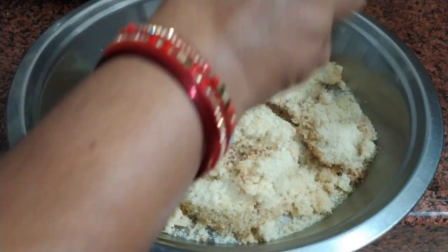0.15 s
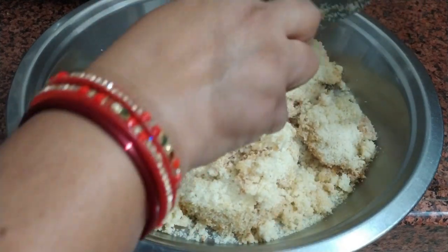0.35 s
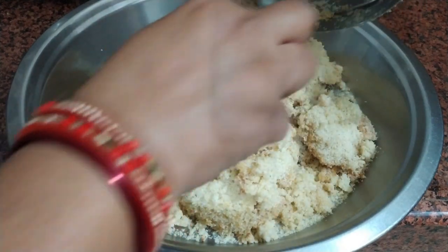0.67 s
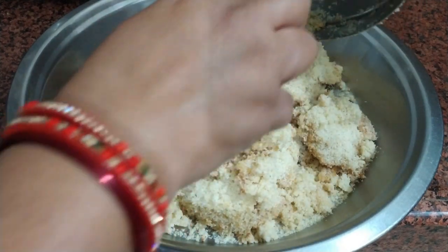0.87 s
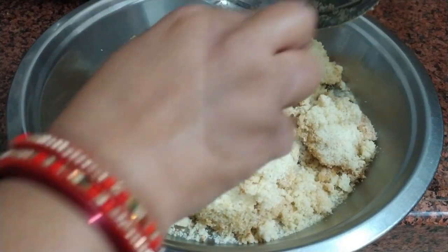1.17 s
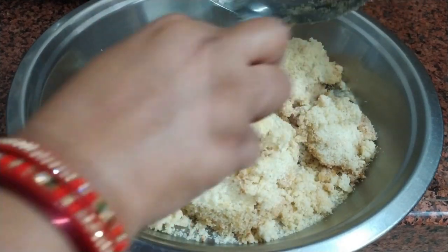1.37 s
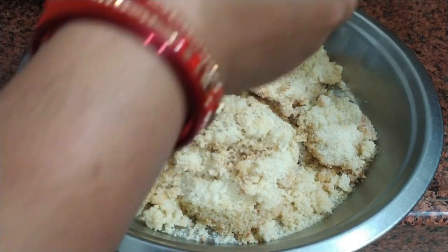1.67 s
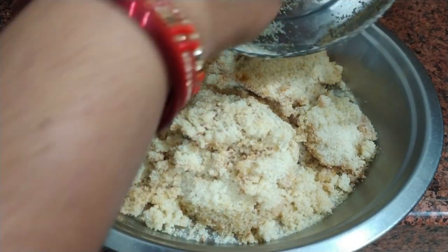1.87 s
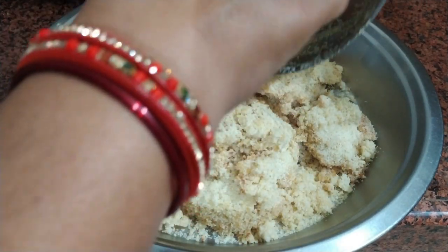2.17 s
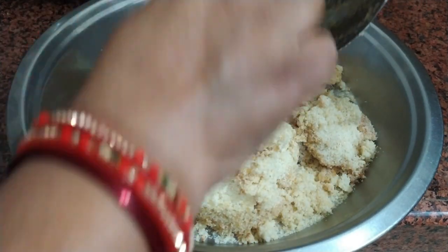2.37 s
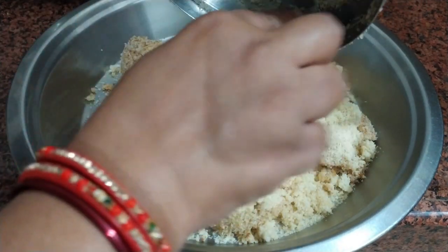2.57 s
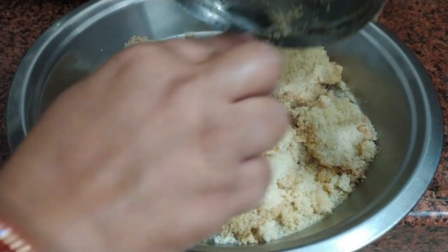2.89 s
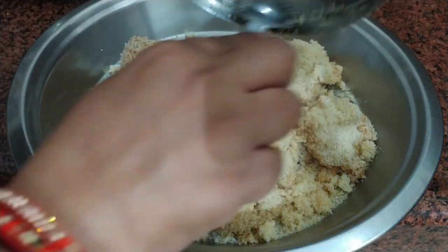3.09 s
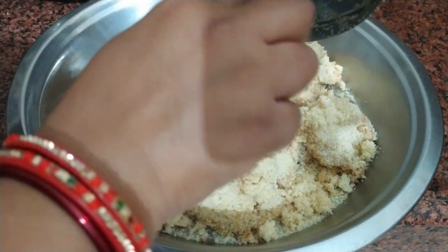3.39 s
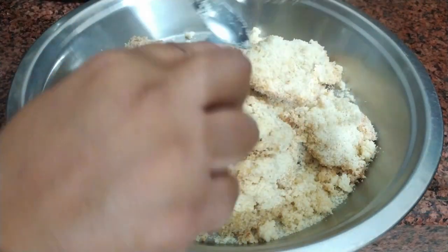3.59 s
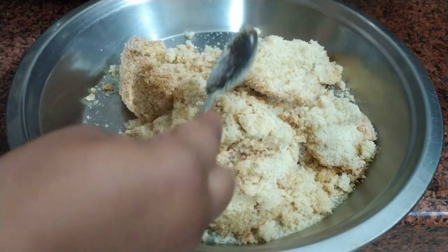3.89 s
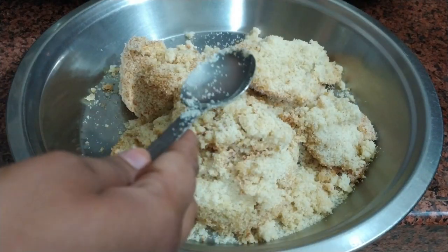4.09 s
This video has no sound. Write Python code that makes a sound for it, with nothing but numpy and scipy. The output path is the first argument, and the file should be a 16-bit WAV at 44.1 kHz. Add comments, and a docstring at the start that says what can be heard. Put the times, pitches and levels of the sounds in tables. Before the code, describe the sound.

A steel spoon knocks and scrapes briskly inside a hand-held steel tin, hollow and gritty, then clanks against a wide steel bowl.

```python
"""Spoon in a steel tin

A steel spoon knocks and scrapes inside a hand-held steel tin, then the tin is set down against a wide bowl.
Blows excite many thin wall modes beside the tin's swelling hollow note; random catches of grit make the hiss
of each stroke. The bowl adds longer, fluttering modes and a beating rim pair. A small hard kitchen answers,
over a low hum and room noise, heard by two close microphones."""
import sys
import numpy as np
from scipy import signal
from scipy.fft import rfft, irfft
from scipy.io import wavfile

SR = 44100
rng = np.random.default_rng(int(sys.argv[2]) if len(sys.argv) > 2 else 0)


def magnitude_from_level(level_db):
    """Linear magnitude for a level in decibels (20 dB per decade)."""
    exponent = np.asarray(level_db, float) / 20
    return 10 ** exponent


def master_out(mix):
    """Clip the mix to full scale and print it as 16-bit PCM to the path in sys.argv[1]."""
    frames = np.transpose(np.atleast_2d(mix))
    ceiling = np.clip(frames, -1, 1)
    pcm = np.round(ceiling * 32767).astype(np.int16)
    wavfile.write(sys.argv[1], SR, pcm)


N = 187072

# blows of steel on steel, strength per register of modes:
# (t/s, tick level/dB, clink level/dB, clank level/dB, knock level/dB, thud level/dB)
KNOCKS = [(0.007, -43.5, -60.5, -61, -53.5, -53), (0.0824, -41.5, -50.5, -47.5, -45, -60),
          (0.2392, -64.5, -74, -70, -58.5, -70), (0.305, -46, -58, -57, -56, -47.5),
          (0.344, -64, -79, -58, -56, -57), (0.3845, -62, -59, -64, -66, -50),
          (0.48, -60, -64, -63, -58, -56), (0.509, -56, -62, -54, -65, -62),
          (0.5344, -38, -49, -42.5, -44.5, -40), (0.6155, -55, -53.5, -46, -71, -64),
          (0.718, -58, -66, -72, -65, -67), (0.7261, -68, -62, -71, -79, -46.5),
          (0.943, -42, -53.5, -46, -55.5, -46), (1.062, -39.5, -49, -51.5, -61, -50),
          (1.247, -36, -49.5, -52, -54.5, -61), (1.3505, -29.5, -40, -52.5, -47.5, -49.5),
          (1.5798, -32.5, -32, -45.5, -36, -41), (1.8229, -50, -52.5, -56, -58, -48),
          (2.157, -46.5, -57, -58.5, -49, -47), (2.222, -38, -50, -44, -46, -42),
          (2.548, -42.5, -50.5, -47, -55.5, -44), (2.61, -44, -45.5, -45.5, -60, -55),
          (2.7333, -29.5, -38.5, -54, -52.5, -40), (3.0043, -35.5, -47.5, -55, -55.5, -53.5),
          (3.097, -31.5, -40, -60, -54.5, -55.5), (3.3679, -47, -57, -58, -51.5, -47.5),
          (3.5184, -30, -40.5, -57, -53, -51.5), (3.7712, -60.5, -76, -73, -68, -78),
          (4.032, -35.5, -31.5, -32.5, -31, -54.5), (4.06, -55, -54, -54, -46, -63),
          (4.113, -46.5, -45, -39.5, -37, -60), (4.127, -58, -59, -45, -48, -59),
          (4.152, -62, -71, -45, -44.5, -70)]
# stereo width over pitch: (f/Hz, side over mid level/dB)
WIDTH = [(60, -0.5), (150, -17), (380, -6.5), (700, -3.5), (1200, -1.5), (2380, -2), (5980, 0.5),
         (15000, 0)]
# stereo balance over pitch: (f/Hz, left over right level/dB)
LEAN = [(60, 0.0), (150, 1.5), (380, -6), (950, 2), (2380, 0.5), (5980, -1.5), (9500, -3), (15000, 1.5)]
SIDES = np.array([[1], [-1]])   # left, right
AFTER = np.arange(SR // 4) / SR   # seconds since a touch
SET_DOWN_S = 4.033
NOTE_SWELL_S, CHOKE_S = 0.0038, 0.01   # swell of the tin's tones; time a damping touch takes
LAND_S = 0.0092   # contact grows over this time


def rms_one(x):
    """Scales to unit rms."""
    return x / np.sqrt(np.mean(x ** 2) + 1e-20)


def at_hz(points, hz):
    """Reads a spectrum on a log-frequency axis."""
    point_hz, values = np.array(points).T
    return np.interp(np.log(hz), np.log(point_hz), values)


def band(x, low_hz, high_hz):
    """Band-pass."""
    return signal.sosfilt(signal.butter(2, [low_hz, high_hz], "band", fs=SR, output="sos"), x)


def add(out, s, sound):
    """Mixes a sound in from second s on."""
    at = int(s * SR)
    out[:, at:at + sound.shape[1]] += sound[:, :N - at]


def spread(low_hz, high_hz, count):
    """Evenly crowded pitches, each a little out of place."""
    return low_hz + (high_hz - low_hz) * (np.arange(count) + rng.random(count)) / count


def wobble(per_s):
    """Slow chance: random heights joined by straight lines."""
    place = np.arange(N) / SR * per_s
    count = int(N / SR * per_s) + 2
    return np.interp(place, np.arange(count), rng.standard_normal(count))


def lands_on_bowl(s):
    """Only the last blows, around the set-down, meet the bowl."""
    return s > SET_DOWN_S - .01


def room_noise():
    """Steady shaped noise, as wide as the rest, and a slightly wavering hum: noise in a narrow band."""
    # room noise spectrum: (f/Hz, level per Hz/dB)
    air_spectrum = [(12, -31), (20, -4), (42, -7.5), (76, -7.5), (100, -9.5), (140, -11), (268, -2),
                    (336, -5.5), (434, -1), (644, -7), (2290, -14), (4770, -25), (5500, -26), (9140, -21),
                    (15600, -36), (17000, -50)]
    air_db, hum_hz, hum_db = -59, 276.2, -66.5
    hz = np.maximum(np.fft.rfftfreq(N, 1 / SR), 1)
    colour_db = at_hz(air_spectrum, hz) + [0 * hz, at_hz(WIDTH, hz)]
    mid, side = irfft(rfft(rng.standard_normal((2, N))) * magnitude_from_level(colour_db), N)
    hum = magnitude_from_level(hum_db) * rms_one(band(rng.standard_normal(N), hum_hz - 5, hum_hz + 5))
    return magnitude_from_level(air_db) / np.std(mid) * (mid + side * SIDES) + hum


def hollow_notes():
    """The tin's note swells within a few cycles, settles from sharp, and is choked by spoon or fingers."""
    # the tin's hollow note: (t/s, level/dB, f/Hz, damped after/s)
    note_events = [(0.001, -30.5, 433, 0.099), (0.083, -25.5, 438, 0.031), (0.24, -36.5, 460, 0.0074),
                   (0.307, -26, 470, 0.0064), (0.344, -31, 439, 0.044), (0.382, -34, 437, 0.039),
                   (0.479, -37.5, 432, 0.02), (0.51, -31, 460, 0.0086), (0.537, -14, 439, 0.0257),
                   (0.725, -32, 432, 0.04), (0.908, -36.5, 443, 0.027), (0.946, -22.5, 428.5, 0.023),
                   (1.063, -32.5, 432, 0.032), (1.252, -36, 432, 0.025), (1.349, -40.5, 443, 0.085),
                   (1.581, -11.5, 443, 0.011), (1.624, -25.5, 448, 0.012), (1.655, -31, 473, 0.025),
                   (1.697, -35, 426, 0.032), (1.743, -43, 470, 0.034), (1.79, -47, 437, 0.026),
                   (1.824, -31, 436, 0.083), (2.155, -28.5, 462, 0.018), (2.221, -34, 411, 0.018),
                   (2.32, -36.5, 450, 0.0092), (2.552, -16.5, 425, 0.023), (2.621, -36.5, 449, 0.027),
                   (2.734, -27, 437, 0.041), (3.012, -37.5, 428, 0.046), (3.097, -32.5, 440, 0.059),
                   (3.37, -24, 428, 0.026), (3.518, -26, 439, 0.051)]
    note_t60_s, choke_end_db = 0.14, -20.5
    sag_share, sag_s = 0.038, 0.0051   # the note starts sharp while the wall is bent
    twin_ratio, twin_db, twin_t60_s = 1.09, -15, 0.12   # close twin, beating against the note
    out, t = np.zeros((2, N)), AFTER
    lean = magnitude_from_level(at_hz(LEAN, 436) / 2 * SIDES)
    bent_time = t + sag_share * sag_s * (1 - np.exp(-t / sag_s))
    swell = 1 - np.exp(-t / NOTE_SWELL_S)
    for s, note_db, hz, free_s in note_events:
        choke_db = choke_end_db * np.clip((t - free_s) / CHOKE_S, 0, 1)
        note = magnitude_from_level(-60 * t / note_t60_s + choke_db) * np.sin(2 * np.pi * hz * bent_time)
        twin_fade = magnitude_from_level(twin_db - 60 * t / twin_t60_s + choke_db / 2)
        twin = twin_fade * np.sin(2 * np.pi * hz * twin_ratio * t)
        add(out, s, lean * magnitude_from_level(note_db) * swell * (note + twin))
    return out


def kitchen(x):
    """Dense reflections after a short gap die band by band, more alike at the two microphones in the bass."""
    # reverberation by band: (from f/Hz, to f/Hz, t60/s, level/dB)
    reverb_bands = [(149, 610, 0.43, -12.5), (614, 1270, 0.48, -9), (1500, 6600, 0.39, -4.5),
                    (6300, 17000, 0.27, -7.5)]
    t = np.arange(SR // 2) / SR
    onset = np.clip((t - .004) / 0.0078, 0, 1)
    echo = 0
    for low_hz, high_hz, t60, level_db in reverb_bands:
        mid, side = rng.standard_normal((2, len(t)))
        width = magnitude_from_level(at_hz(WIDTH, np.sqrt(low_hz * high_hz)))
        tail = (mid + width * side * SIDES) * magnitude_from_level(-60 * t / t60) * onset
        even_tail = tail / np.sqrt(np.sum(tail ** 2) / 2)
        echo = echo + magnitude_from_level(level_db) * band(even_tail, low_hz, high_hz)
    return signal.fftconvolve(x, echo, axes=1)[:, :N]


def steel_modes():
    """Pitch, decay and two-microphone oscillation of every wall mode; modes reach the two sides a phase apart."""
    # strongest wall modes: (f/Hz, level/dB, t60/s before a touch scales it)
    wall_modes = [(130, -23, 0.057), (169, -7, 0.096), (198, -3.5, 0.07), (229, 0, 0.062),
                  (277, -1.5, 0.049), (432, 7, 0.15), (481, 1, 0.079), (765.5, 6.5, 0.056), (895, 3, 0.071),
                  (968, 3.5, 0.056), (1420, -24, 0.053), (1504, 11, 0.03), (1722, 10.5, 0.026),
                  (1910, -3.5, 0.021), (2349, -1.5, 0.064), (2650, -8, 0.02), (3017, 0, 0.027),
                  (4711, -7.5, 0.045), (6970, -4.5, 0.062), (7700, -11.5, 0.06), (8450, -0.5, 0.073),
                  (8960, -6, 0.055), (9560, -4, 0.076), (10470, -2, 0.07)]
    # level of the crowd of lesser modes: (f/Hz, level/dB)
    crowd_levels = [(500, -3), (640, -11), (900, -2.5), (1250, -5), (1500, -5), (2500, -5.5), (3200, -13),
                    (4640, -13.5), (5530, -16), (6300, -13), (6870, -11), (8260, -0.5), (9770, 0),
                    (11000, -6), (11700, -12), (12300, -19.5), (15500, -24), (17500, -45)]
    # typical decay of the crowd, varied mode by mode: (f/Hz, t60/s)
    crowd_decays = [(500, 0.12), (2500, 0.046), (9000, 0.025), (17000, 0.033)]
    crowd = np.r_[spread(500, 3000, count=75), spread(3000, 17500, count=230)]
    crowd_t60 = at_hz(crowd_decays, crowd) * rng.uniform(.5, 1.5, len(crowd))
    lesser = np.c_[crowd, at_hz(crowd_levels, crowd), crowd_t60]
    hz, level_db, t60 = np.vstack([wall_modes, lesser]).T
    apart = np.arctan(magnitude_from_level(at_hz(WIDTH, hz))) * rng.choice([-1, 1], len(hz)) * SIDES
    gain = magnitude_from_level(level_db + at_hz(LEAN, hz) / 2 * SIDES) / np.cos(apart)
    phase = 2 * np.pi * hz[:, None] * AFTER[:SR // 8] + apart[..., None]
    return hz, t60, gain[..., None] * np.sin(phase)


def strike(modes, mode_db, length, spread_db, shift):
    """One touch: each mode has its own strength and sign; the contact closes in about a millisecond."""
    hz, t60, swing = modes
    luck = rng.standard_normal((2, len(hz)))
    t = AFTER[:swing.shape[-1]]
    fade = np.exp(-np.log(1000) * t / (length * t60[:, None]))
    weights = magnitude_from_level(mode_db + spread_db * luck[0]) * np.sign(luck[1])
    ring = np.einsum("m,mt,cmt->ct", weights, fade, swing)
    # resampling bends all pitches of the touch together
    bent = signal.resample(ring, int(len(t) * (1 + shift * rng.standard_normal())), axis=1)
    bent = np.pad(bent, [(0, 0), (0, len(AFTER) - bent.shape[-1])])
    return bent * (1 - np.exp(-AFTER / .0009))


def knocks(modes):
    """A blow's register levels are joined across the modes; the last blows take the bowl's colour."""
    # centres of the tick, clink, clank, knock and thud registers: (f/Hz)
    register_pitches = [6000, 2200, 1300, 800, 200]
    # how the wide bowl differs from the tin: (f/Hz, level/dB)
    bowl_colour = [(500, 3), (700, -8.5), (830, -4.5), (930, 3.5), (1200, 5.5), (1600, -2.5), (2300, 3),
                   (2800, -18), (3500, -7.5), (6500, 8.5), (9000, -0.5), (13000, -8.5)]
    crack_db, crack_s = 3.0, 0.0031   # extra strength of a blow's first instants, dying away
    crack = 1 + (magnitude_from_level(crack_db) - 1) * np.exp(-AFTER / crack_s)
    out = np.zeros((2, N))
    for s, *levels in KNOCKS:
        mode_db = at_hz(list(zip(register_pitches, levels))[::-1], modes[0])
        if lands_on_bowl(s):
            mode_db = mode_db + at_hz(bowl_colour, modes[0])
        # length scales the modes' t60; shift is the typical share by which pitch is bent
        add(out, s, strike(modes, mode_db, length=0.9, spread_db=2.0, shift=0.016) * crack)
    return out


def pushes():
    """Every blow moves a little air: one soft low pulse, alike at both microphones."""
    push_db, push_s = -25.5, 0.006   # against the blow's tick level; time to the pulse's peak
    pulse = AFTER / push_s * np.exp(1 - AFTER / push_s)
    out = np.zeros((2, N))
    for s, tick_db, *_ in KNOCKS:
        add(out, s, magnitude_from_level(tick_db + push_db) * pulse[None])
    return band(out, 18, 400)


def stroke_levels():
    """Hiss and rumble drive: pressure changes evenly in dB through a stroke; bowl blows leave a dying rattle."""
    # spoon strokes along the wall, drive levels:
    # (start t/s, end t/s, hiss level at start/dB, hiss level at end/dB, rumble level/dB)
    stroke_events = [(0.015, 0.073, -47, -56, -61), (0.096, 0.283, -41, -41, -53),
                     (0.28, 0.31, -42, -33.5, -59), (0.309, 0.355, -36.5, -50, -56.5),
                     (0.364, 0.405, -42, -57, -56), (0.591, 0.656, -47.5, -43, -55.5),
                     (0.666, 0.718, -41.5, -41, -61), (0.948, 1.054, -48, -40, -64),
                     (1.247, 1.348, -51, -36.5, -55.5), (1.621, 1.665, -41, -34.5, -55),
                     (1.674, 1.819, -39.5, -34.5, -51.5), (1.823, 1.925, -36, -34, -51),
                     (1.927, 2.048, -34.5, -36, -52.5), (2.25, 2.3, -42, -31, -53.5),
                     (2.295, 2.336, -37.5, -40, -53.5), (2.34, 2.4, -45, -42, -61.5),
                     (2.399, 2.413, -39, -36, -59), (2.42, 2.417, -44, -58, -63),
                     (2.596, 2.724, -44.5, -44, -60), (3.005, 3.02, -50, -52, -55),
                     (3.05, 3.081, -43, -39.5, -62.5), (3.399, 3.421, -47, -39.5, -57.5),
                     (3.444, 3.515, -49, -40, -59.5), (4.05, 4.103, -54, -63, -50),
                     (4.112, 4.132, -44, -49, -70)]
    lift_db_per_s = 905   # fall as the spoon lifts off
    judder_db, judder_s = 10.5, 0.021   # the wall rumbles more just after the spoon lands
    rattle_db, rattle_t60_s = -4.5, 0.29   # the bowl rocks: against the blow's knock level
    t, hiss, rumble = np.arange(N) / SR, 0, 0
    for start, end, first_db, last_db, rumble_db in stroke_events:
        since = np.maximum(t - start, 0)
        lift = magnitude_from_level(-lift_db_per_s * np.maximum(t - end, 0))
        contact = np.clip(since / LAND_S, 0, 1) * lift
        hiss = hiss + contact * magnitude_from_level(np.interp(t, [start, end], [first_db, last_db]))
        rumble = rumble + contact * magnitude_from_level(rumble_db + judder_db * np.exp(-since / judder_s))
    for s, *_, knock_db, thud_db in KNOCKS:
        if lands_on_bowl(s):
            since = np.maximum(t - s, 0)
            rattle = magnitude_from_level(knock_db + rattle_db - 60 * since / rattle_t60_s)
            rumble = rumble + np.clip(since / LAND_S, 0, 1) * rattle
    return hiss, rumble


def grit(pressure, modes, low_hz, high_hz, length, tilt_db):
    """Crumbs and scratches catch at random, a few hard, at eight spots that each sound the steel and surge."""
    grit_per_s = 3500   # average over all spots together
    patch_db, patch_octaves = 5.0, 0.15   # each spot favours its own patches of pitch
    hz = modes[0]
    inside = np.where((hz > low_hz) & (hz < high_hz), tilt_db * np.log2(hz / low_hz), -150)
    out = 0
    for spot in range(8):
        caught = rng.random(N) < grit_per_s / 8 / SR
        hardness_db = 3.2 * np.minimum(rng.exponential(1, N), 2.6)
        surge_db = 2.8 * wobble(7.97) + 4.3 * wobble(30) + 3.9 * wobble(120)
        sizes = magnitude_from_level(hardness_db + surge_db) * rng.choice([-1, 1], N)
        patches = np.interp(np.log2(hz / 100) / patch_octaves, np.arange(80), rng.standard_normal(80))
        voice = strike(modes, inside + patch_db * patches, length, spread_db=5.5, shift=0.0346)[:, :SR // 8]
        catches = (pressure * rms_one(caught * sizes))[None]
        out = out + signal.oaconvolve(catches, voice / np.linalg.norm(voice), axes=1)[:, :N]
    return out / 2


def overtones():
    """Higher wall tones of the tin, where a blow excites them: swelling, then dying sines."""
    # overtones: (t/s, level/dB, f/Hz)
    overtone_events = [(0.084, -36, 880), (0.239, -47, 857), (0.309, -47, 790), (0.345, -44, 930),
                       (0.481, -50, 742), (0.539, -39.5, 660), (0.945, -47, 758), (1.582, -24, 763),
                       (1.582, -31.5, 998), (1.654, -37, 779), (1.825, -40, 863), (2.156, -36, 767),
                       (2.221, -34, 803), (2.554, -42.5, 737), (2.736, -49, 876), (3.004, -41, 717),
                       (3.373, -40.5, 715)]
    t60_s = 0.1
    out, t = np.zeros((2, N)), AFTER
    swell = 1 - np.exp(-t / NOTE_SWELL_S)
    for s, tone_db, hz in overtone_events:
        add(out, s, magnitude_from_level(tone_db - 60 * t / t60_s) * swell * np.sin(2 * np.pi * hz * t)[None])
    return out


def narrow_tones():
    """Short narrow wall tones, rubbed or struck, swelling and fading: noise in a narrow band."""
    # narrow wall tones: (t/s, f/Hz, level/dB, length/s)
    tone_events = [(0.27, 1384, -48.5, 0.062), (0.612, 1500, -45, 0.022), (1.92, 1500, -53.5, 0.089),
                   (1.932, 757, -51.5, 0.13), (3.064, 4690, -48.5, 0.034), (3.426, 1580, -50, 0.023)]
    out = np.zeros((2, N))
    for s, hz, level_db, length in tone_events:
        tone = rms_one(band(rng.standard_normal((2, len(AFTER))), hz * 0.98, hz * 1.02))
        add(out, s, magnitude_from_level(level_db) * tone * np.sin(np.pi * np.clip(AFTER / length, 0, 1)))
    return out


def bowl():
    """Blows on the bowl ring its own modes, each with a new strength and phase, fluttering as the bowl rocks."""
    # longer-ringing modes of the bowl: (f/Hz, level/dB, t60/s)
    bowl_modes = [(880, -5, .3), (930, 4.5, 0.44), (930, -5, .2), (1171, -1, .4), (1280, -7, 0.36),
                  (1360, 4, .2), (1440, -13, 0.44), (1580, -8, 0.23), (1690, -4, .4), (1846, -5, 0.18),
                  (2060, -16, .4), (2310, -5, 0.17), (2439, -19, 0.19), (2606, -19, .3)]
    bowl_db = -13.5   # against the blow's knock level
    rock_db, rock_per_s = 6, 67   # typical depth of the flutter; new heights per second
    count = len(bowl_modes)
    out = np.zeros((2, N))
    hz, level_db, t60 = np.transpose(bowl_modes)[..., None]
    for s, *_, knock_db, thud_db in KNOCKS:
        if lands_on_bowl(s):
            luck = rng.standard_normal((3, count, 1))
            phase = 2 * np.pi * (hz * AFTER + luck[1]) + luck[2] / 2 * SIDES[..., None]
            heights = rng.standard_normal((count, 40))
            flutter = np.array([np.interp(AFTER * rock_per_s, np.arange(40), row) for row in heights])
            strength_db = knock_db + bowl_db + level_db + 2.5 * luck[0]
            rings = magnitude_from_level(strength_db + rock_db * flutter - 60 * AFTER / t60) * np.sin(phase)
            add(out, s, rings.sum(axis=1) * (1 - np.exp(-AFTER / 0.0023)))
    return out


def bowl_rim():
    """Two close rim tones start opposed and beat until both are choked, one far more than the other."""
    # the rim's ring: (level/dB, t60/s, damped after/s)
    rim_ring = (-31, 1.0, 0.094)
    # beating pair: (f/Hz)
    rim_pitches = [428, 433.3]
    first_choke_db, second_choke_db = -6, -31
    out, t = np.zeros((2, N)), AFTER
    level_db, t60, free_s = rim_ring
    choked = np.clip((t - free_s) / CHOKE_S, 0, 1)
    first = magnitude_from_level(first_choke_db * choked) * np.sin(2 * np.pi * rim_pitches[0] * t)
    second = magnitude_from_level(second_choke_db * choked) * np.sin(2 * np.pi * rim_pitches[1] * t)
    lean = magnitude_from_level(at_hz(LEAN, 436) / 2 * SIDES)
    add(out, SET_DOWN_S, lean * magnitude_from_level(level_db - 60 * t / t60) * (first - second))
    return out


def scene():
    """Steel close by, its reflections and the room; small objects radiate no deep bass."""
    modes = steel_modes()
    hiss, rumble = stroke_levels()
    scrape = grit(hiss, modes, 3024, 18000, length=0.9, tilt_db=4.5)
    scrape = scrape + grit(rumble, modes, 400, 2650, length=0.77, tilt_db=-1.5)
    tin = hollow_notes() + knocks(modes) + scrape + overtones() + narrow_tones()
    near = band(tin + bowl() + bowl_rim(), 91, 20600)
    return near + kitchen(near) + pushes() + room_noise()


def top_cut(x):
    """Nothing passes above the cut-off."""
    return signal.sosfilt(signal.butter(12, 17750, fs=SR, output="sos"), x)


def record(dry):
    """The finished mix is stored."""
    return top_cut(dry)


dry = scene()
out = record(dry)
master_out(out)
```